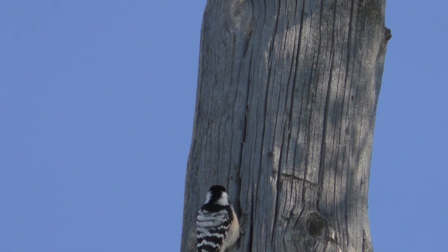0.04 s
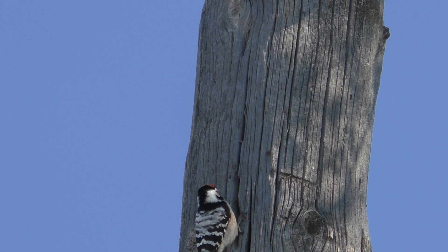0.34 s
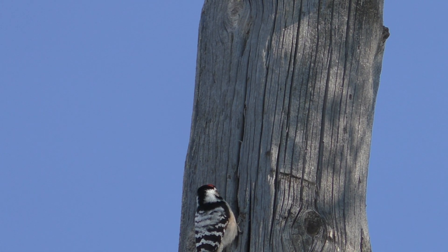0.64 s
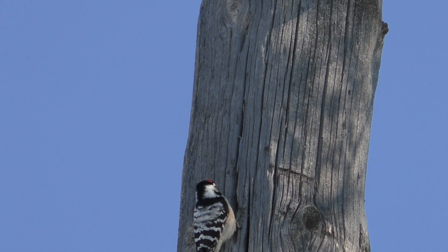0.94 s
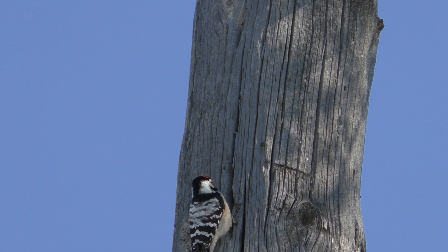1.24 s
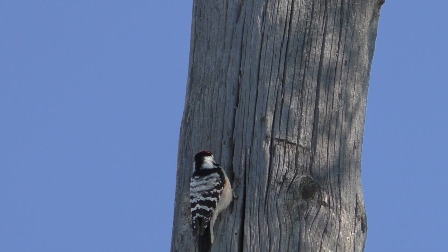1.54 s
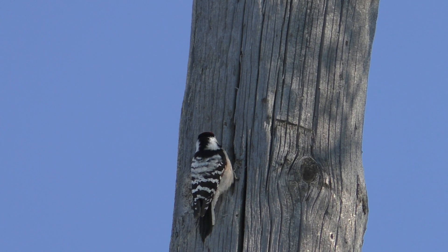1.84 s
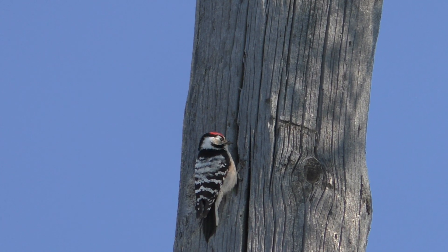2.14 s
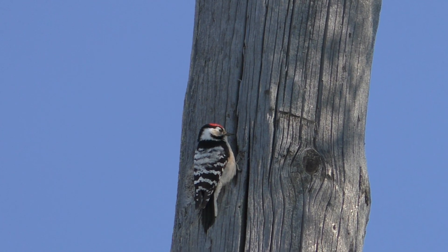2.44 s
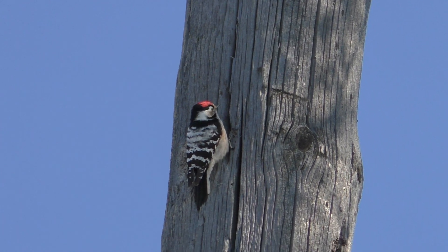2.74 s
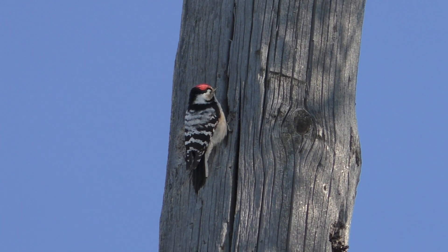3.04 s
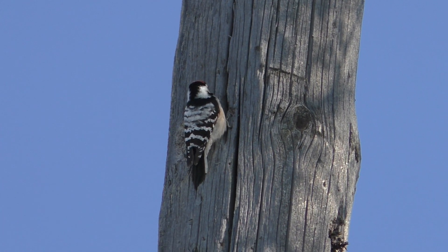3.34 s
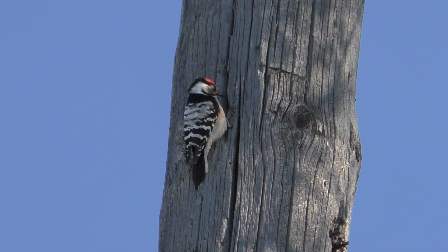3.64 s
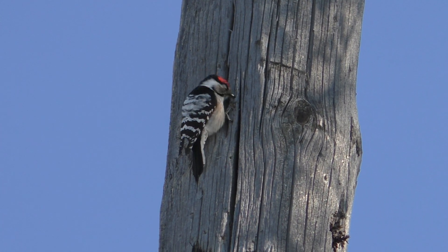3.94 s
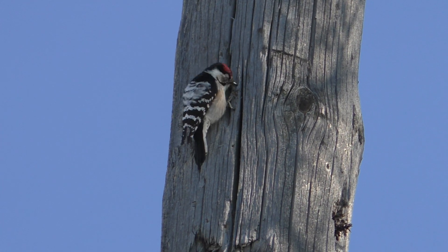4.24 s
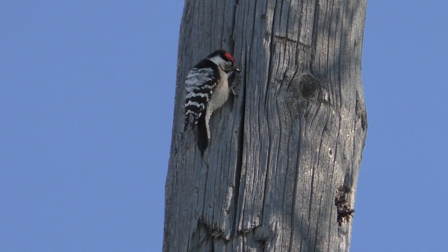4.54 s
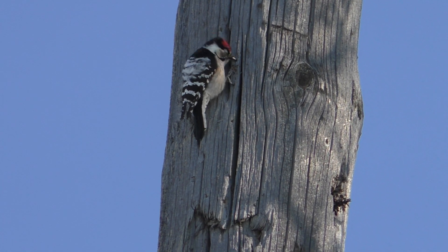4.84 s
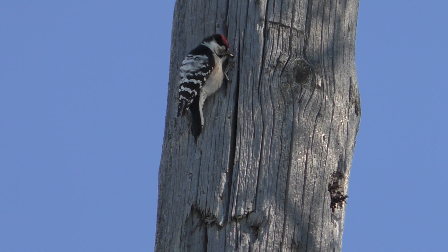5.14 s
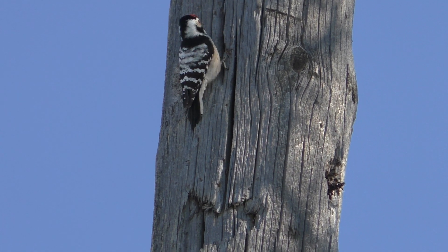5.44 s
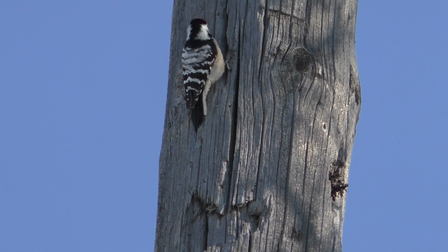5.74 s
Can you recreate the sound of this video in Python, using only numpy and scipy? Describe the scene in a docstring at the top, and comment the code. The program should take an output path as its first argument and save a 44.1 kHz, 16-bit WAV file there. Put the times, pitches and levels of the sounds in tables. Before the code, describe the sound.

The sound begins with very quiet forest air: a low, wide rumble and a thin, smooth hiss. Soft, deep puffs of wind touch the microphone in the first second, and a faint distant rush dies away at about 1.7 seconds. Only the quiet background continues until about 3.8 seconds, when a small woodpecker gives three lighter taps on a dead, dry trunk. These run straight into a fast, even drum roll, about seventeen knocks a second, twenty-six in all. Each knock is sharp and close, with a brief wooden ring and short echoes off nearby wood and ground. The roll quickly reaches full strength, slows very slightly and stops at about 5.3 seconds. Rumble and hiss swell gently beneath it, with a few more soft wind puffs, then drop back. A faint echo from the far trees fades into the outdoor air toward 6 seconds.

```python
"""A small woodpecker drums on a dead, dry trunk in a forest: 26 knocks, about 17 a second.
Each strike of the bill rings the wood near 1.3 kHz. The microphone hears it directly, then as echoes
off nearby wood and ground, then as a faint tail from the far trees. Behind the bird lie a low rumble,
soft puffs of wind, outdoor air, a distant rush that dies away early, and a thin hiss.
Rumble and hiss swell during the roll."""
import sys
import numpy as np
from scipy import signal
from scipy.fft import rfft, irfft, next_fast_len
from scipy.io import wavfile
from scipy.ndimage import uniform_filter1d

SR = 44100
rng = np.random.default_rng(int(sys.argv[2]) if len(sys.argv) > 2 else 0)


def unload_audio(sound):
    """Save the sound as a 16-bit wav file, at the path given as the first command line argument."""
    columns = np.transpose(np.atleast_2d(sound))
    # keep every value between -1 and 1, then stretch to whole-number steps
    steps = np.round(np.clip(columns, -1, 1) * 32767)
    wavfile.write(sys.argv[1], SR, steps.astype(np.int16))


N = 259308


def undb(db):
    """Decibels to gain."""
    return 10 ** (np.asarray(db) / 20)


def waver(rate_hz):
    """Random levels held 1 / rate_hz s and smoothed twice; deviation near 1."""
    hold = int(SR / rate_hz)
    held = np.repeat(rng.standard_normal(N // hold + 1), hold)
    return 1.3 * uniform_filter1d(uniform_filter1d(held, hold), hold)[:N]


def spread(pair, side_db):
    """Mid and side to left and right at equal total power."""
    mid, side = pair[0], pair[1] * undb(side_db)
    return np.array([mid + side, mid - side]) / np.sqrt(1 + undb(side_db) ** 2)


def ambience(spectrum):
    """Noise from all around the microphone, shaped by (frequency [Hz], level [dB]) points; rms 1."""
    # stereo width of the background: (frequency [Hz], side against mid [dB])
    width = [(60, -1), (110, -2), (200, 0.5), (380, -4.5), (700, -12), (1290, -1), (2380, -1.5),
             (4400, -0.5), (8120, -10), (15000, -1)]
    width_hz, width_db = np.transpose(width)
    hz, db = np.transpose(spectrum)
    size = next_fast_len(N)
    log_hz = np.log(np.maximum(np.fft.rfftfreq(size, 1 / SR), 1))
    gain = undb(np.interp(log_hz, np.log(hz), db, left=-np.inf, right=-np.inf))
    side_db = np.interp(log_hz, np.log(width_hz), width_db)
    white = rfft(rng.standard_normal((2, size)))
    noise = irfft(spread(white, side_db) * gain, size)[:, :N]
    return noise / noise.std()


def swell(t, start_s=3.84, rise_s=0.53, end_s=5.32, fall_s=0.085):
    """Curve within 0 to 1 that rises while the bird drums and drops back when it stops."""
    rise = 1 - np.exp(-np.maximum(t - start_s, 0) / rise_s)
    return rise * np.clip(1 - (t - end_s) / fall_s, 0, 1)


def rumble(t, level_db=-66, swell_db=6.5, waver_db=0.7):
    """Low, wide outdoor rumble that wavers and swells during the roll."""
    # spectrum of the rumble: (frequency [Hz], relative level [dB])
    spectrum = [(12, -52), (20, -10.5), (43, -3.5), (64, -1.5), (92, -2.5), (160, -5), (270, -11.5),
                (365, -13), (426, -14), (471, -23), (600, -31.5), (780, -40), (1320, -120)]
    return ambience(spectrum) * undb(level_db + swell_db * swell(t) + waver_db * waver(rate_hz=7))


def wind(t):
    """Soft puffs of wind, felt at the microphone only in the deep bass."""
    # spectrum of the wind: (frequency [Hz], relative level [dB])
    spectrum = [(25, -3), (60, -1.5), (130, -3), (220, -10.5), (350, -36.5)]
    # single puffs: (peak time [s], half-length [s], level [dB])
    puffs = [(0.023, 0.061, -60.5), (.135, 0.017, -56), (.26, 0.034, -63), (0.696, 0.031, -58.5),
             (2.158, 0.084, -70), (4.47, 0.037, -64.5), (5.21, 0.027, -59), (5.447, 0.019, -62)]
    envelope = sum(undb(db) * np.exp(-((t - peak_s) / half_s) ** 2) for peak_s, half_s, db in puffs)
    return ambience(spectrum) * envelope


def air(level_db=-74.5, waver_db=0.5):
    """The open air of the place: a quiet midrange bed that wavers slightly."""
    # spectrum of the outdoor air: (frequency [Hz], relative level [dB])
    spectrum = [(480, -21), (580, -12.5), (720, -2), (810, -11.5), (880, 0), (970, -11), (1100, -5),
                (1250, -2), (1340, -6), (1450, 2), (1700, -8), (2700, -9.5), (6000, -22.5), (9000, -36)]
    return ambience(spectrum) * undb(level_db + waver_db * waver(rate_hz=3.94))


def distant_rush(t, start_db=-75.5, sink_db_per_s=2, end_s=1.67, fade_s=0.08):
    """A rush far from the microphone sinks slowly, then dies away."""
    # spectrum of the rush: (frequency [Hz], relative level [dB])
    spectrum = [(400, -40), (700, -4), (1300, -4.5), (2200, -6), (2850, -1.5), (3500, -13), (5000, -28)]
    fade = np.exp(-np.maximum(t - end_s, 0) / fade_s)
    return ambience(spectrum) * undb(start_db - sink_db_per_s * t) * fade


def hiss(t, level_db=-77, swell_db=5):
    """Thin, smooth hiss that swells during the roll."""
    # spectrum of the hiss: (frequency [Hz], relative level [dB])
    spectrum = [(4000, -9.5), (6200, -14.5), (7500, -10), (9000, -4.5), (11000, -1), (13000, -1.7),
                (16000, -4.5)]
    return ambience(spectrum) * undb(level_db + swell_db * swell(t))


def strikes(roll_s=3.97935, count=23, first_gap_s=0.058314, slowing_s=0.000126):
    """Blows of the bill as (time [s], strength [dB]): three taps run into a roll that slows a little."""
    # trial taps before the roll: (time [s], strength [dB])
    taps = [(3.7901, -15), (3.8529, -6), (3.9177, -10.5)]
    k = np.arange(count)
    since_s = k * first_gap_s + slowing_s * k * (k - 1) / 2
    # the roll starts soft, builds to full strength and eases off at the very end
    full_db = 0.29
    build_db = -2.6 * np.exp(-since_s / 0.12)
    ease_db = -1.2 * np.exp((since_s - since_s[-1]) / 0.039)
    return taps + list(zip(roll_s + since_s, full_db + build_db + ease_db))


def trunk(hz, uneven_db=3.5, stages=3):
    """Response of the wood: neighbouring modes swing against each other and take a few cycles to swell."""
    # resonances of the trunk: (frequency [Hz], width of one stage [Hz], level [dB])
    modes = [(441, 246, -15), (1072, 201, 8.9), (1295.3, 254, 17), (1466, 426, 6.5), (2343, 1150, -12),
             (2348, 340, -0.2), (2790, 500, -13.5), (3500, 280, -27.5), (3910, 500, -25),
             (5300, 300, -39.5), (6360, 460, -30.5), (7690, 280, -35.5)]
    response, s = 0, 1j * hz
    for k, (centre, width, db) in enumerate(modes):
        resonance = s * width / (centre ** 2 + s * s + s * width)
        # short waves in the wood depend most on where the bill lands
        chance_db = uneven_db * (centre / modes[-1][0]) * rng.standard_normal()
        response = response + (-1) ** k * undb(db + chance_db) * resonance ** stages
    return response


def stem_thud(hz):
    """Response of the whole stem, which gives a little under the blow."""
    # weak low modes of the stem: (frequency [Hz], width [Hz], level [dB])
    modes = [(260, 31, -17.5), (451, 15, -26), (624, 12.5, -20), (750, 71, -21), (843, 41, -11)]
    return sum((-1) ** k * undb(db) * width * centre / (centre ** 2 - hz ** 2 + 1j * hz * width)
               for k, (centre, width, db) in enumerate(modes))


def shelf(hz, db, from_hz=1600, to_hz=2300):
    """Gain that lifts or lowers everything above the main ring of the wood."""
    return undb(db * np.clip((hz - from_hz) / (to_hz - from_hz), 0, 1))


def bill_tick(size, press_s=0.0013, top_hz=8500):
    """A tiny crunch of wood fibres as the bill tip presses in and lets go."""
    t = np.arange(size) / SR
    contact = t / press_s * np.exp(1 - t / press_s)
    soften = signal.butter(1, top_hz, fs=SR, output="sos")
    return signal.sosfilt(soften, rng.standard_normal(size)) * contact


def drumming(size=4096, detune=0.0037, tick_db=-59):
    """The woodpecker, close up: each strike rings the trunk, and a harder one is brighter."""
    knocks = np.zeros(N + size)
    hz = np.fft.rfftfreq(size, 1 / SR)
    thud = stem_thud(hz)
    for time, db in strikes():
        bright_db = -0.5 + 0.66 * db + 0.5 * rng.standard_normal()
        # the bill never lands on quite the same spot
        wood = trunk(hz * (1 + detune * rng.standard_normal())) * shelf(hz, bright_db)
        start, fraction = divmod(time * SR, 1)
        ring = irfft((wood + thud) * np.exp(-2j * np.pi * hz * fraction / SR))
        # a light tap rings the wood less, but the tip still clicks
        tick = undb(tick_db + 0.25 * db) * bill_tick(size)
        knocks[int(start):int(start) + size] += undb(db) * ring + tick
    return knocks[:N]


def near_echoes(size):
    """Impulse response at the microphone: the direct sound, then echoes off nearby wood and ground."""
    # distinct reflections: (delay [s], left level [dB], right level [dB], brightness [dB])
    echoes = [(0.00202, -22.5, -39.5, 8), (0.00323, -17.5, -25, -1), (0.00433, -15, -20, -17),
              (0.00617, -21.5, -16, -1.5), (0.00668, -18, -16.5, -0.5), (0.00909, -24, -17.5, -5),
              (0.0108, -20.9, -23, -14), (0.01522, -17.5, -14.5, -9), (0.01747, -22, -18, -4),
              (0.0319, -32, -26, 10)]
    hz = np.fft.rfftfreq(size, 1 / SR)
    paths = 1
    for delay_s, left_db, right_db, bright_db in echoes:
        gain = undb([[left_db], [right_db]]) * shelf(hz, bright_db)
        paths = paths + gain * np.exp(-2j * np.pi * hz * delay_s)
    return irfft(paths)


def tree_scatter(size):
    """Countless faint reflections: twigs return the treble early, far trees a faint, long wash."""
    # diffuse tails: (delay [s], time to fall 60 dB [s], level before the band-pass [dB],
    # side against mid [dB], low edge [Hz], high edge [Hz])
    tails = [(.002, 0.12, -8.5, -3.5, 2640, 6940), (0.026, 0.36, -12.5, -1, 1950, 5700),
             (0.027, .3, -19.5, -7, 900, 2800), (0.06, 3.2, -35, -3.5, 800, 2800)]
    response = 0
    for delay_s, t60, db, side_db, low_hz, high_hz in tails:
        t = np.arange(size) / SR - delay_s
        decay = (t > 0) * np.exp(-np.log(1000) * np.maximum(t, 0) / t60)
        tail = spread(rng.standard_normal((2, size)), side_db) * decay
        tail = tail * undb(db) / np.sqrt(np.sum(tail ** 2) / 2)
        band = signal.butter(2, [low_hz, high_hz], "bandpass", fs=SR, output="sos")
        response = response + signal.sosfilt(band, tail)
    return response


def forest(source, size=65536):
    """The way from trunk to microphone: direct sound, near echoes and scatter from the trees."""
    response = near_echoes(size) + tree_scatter(size)
    return signal.fftconvolve(source[None], response[:, :size - size // 8], axes=1)[:, :N]


def scene():
    """The woodpecker among the trees, over the quiet background of the place."""
    t = np.arange(N) / SR
    return forest(drumming()) + rumble(t) + wind(t) + air() + distant_rush(t) + hiss(t)


def record(dry):
    """The recorder cuts the top steeply above 15.85 kHz."""
    return signal.sosfilt(signal.ellip(12, 0.1, 70, 15850, fs=SR, output="sos"), dry)


dry = scene()
out = record(dry)
unload_audio(out)
```